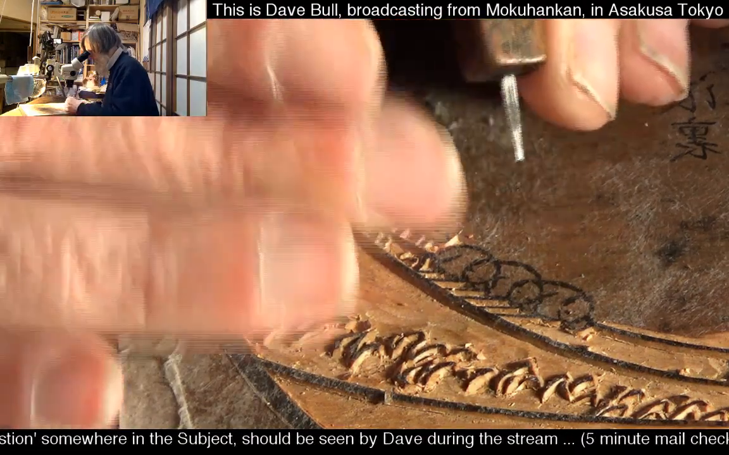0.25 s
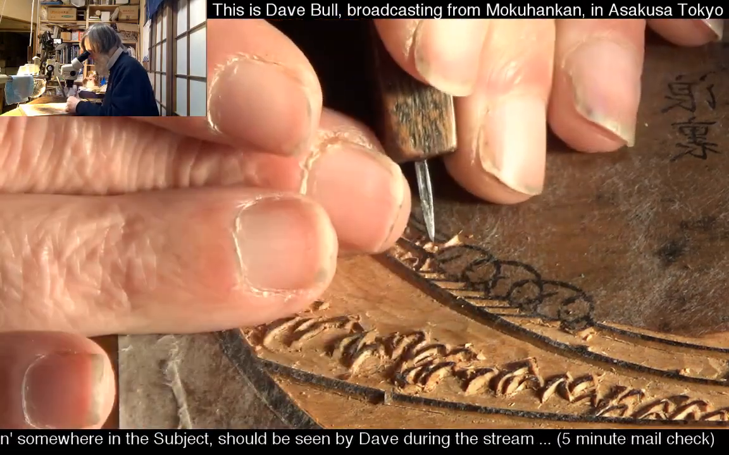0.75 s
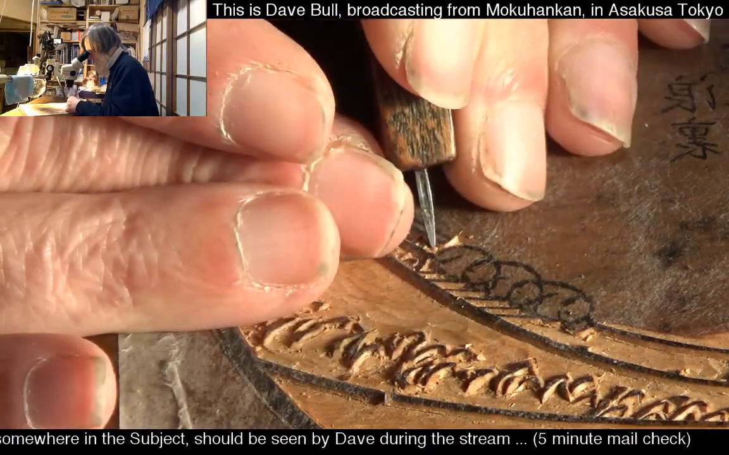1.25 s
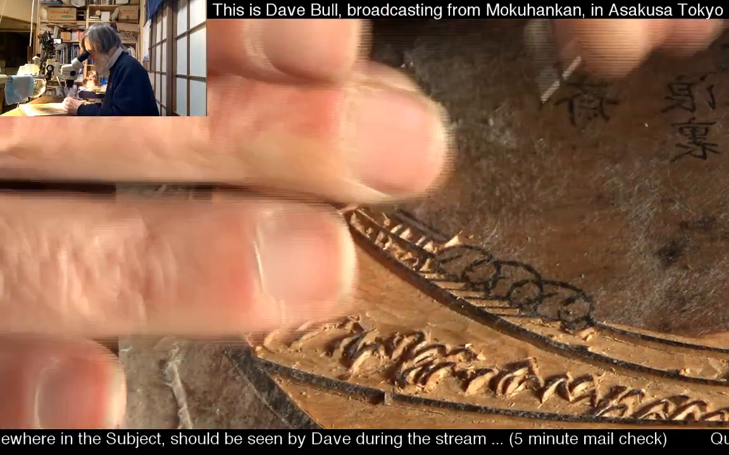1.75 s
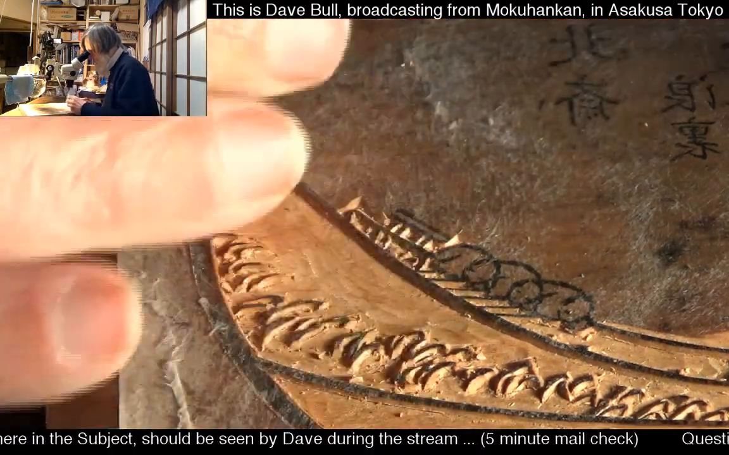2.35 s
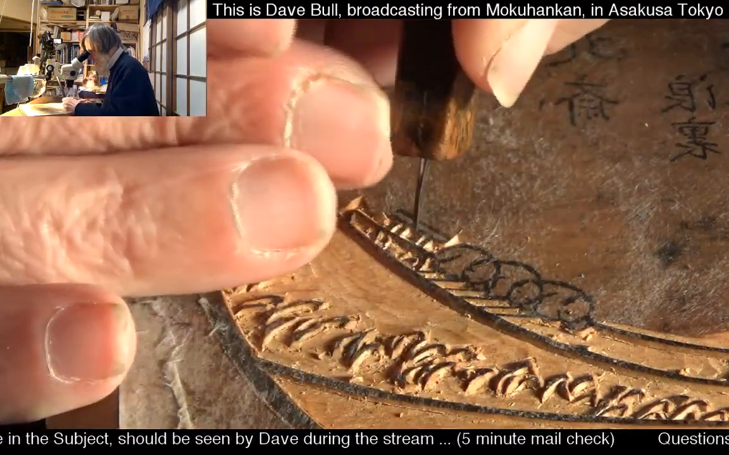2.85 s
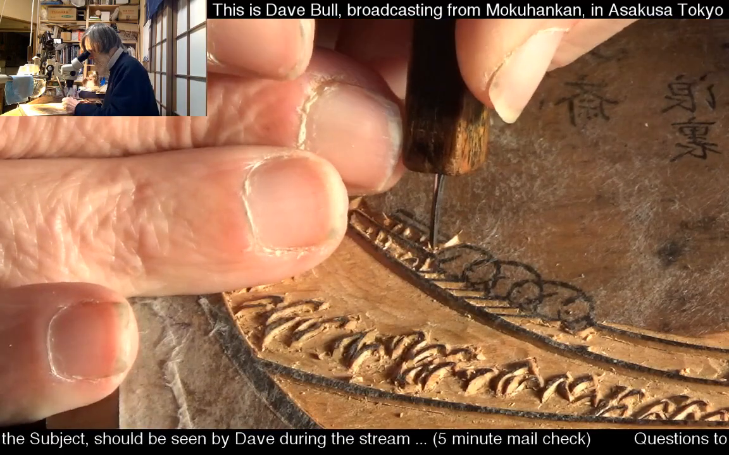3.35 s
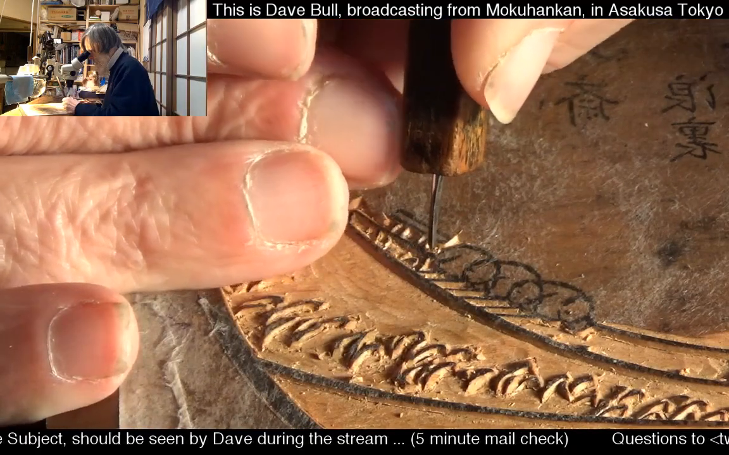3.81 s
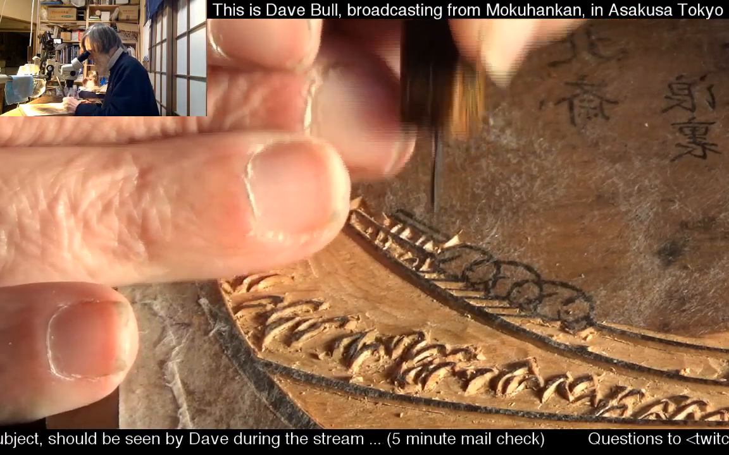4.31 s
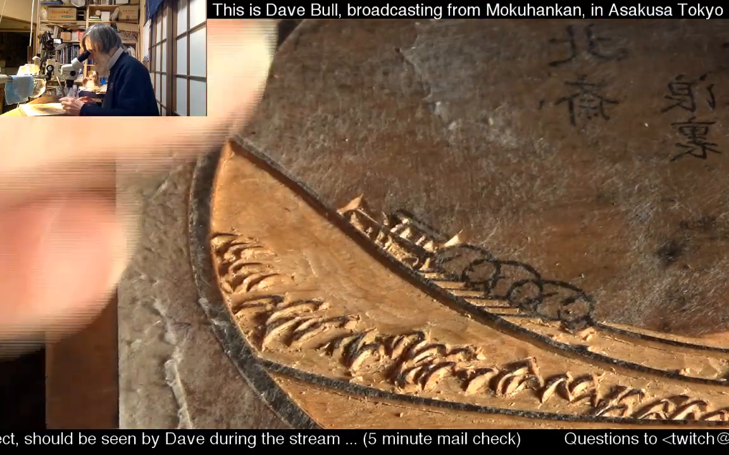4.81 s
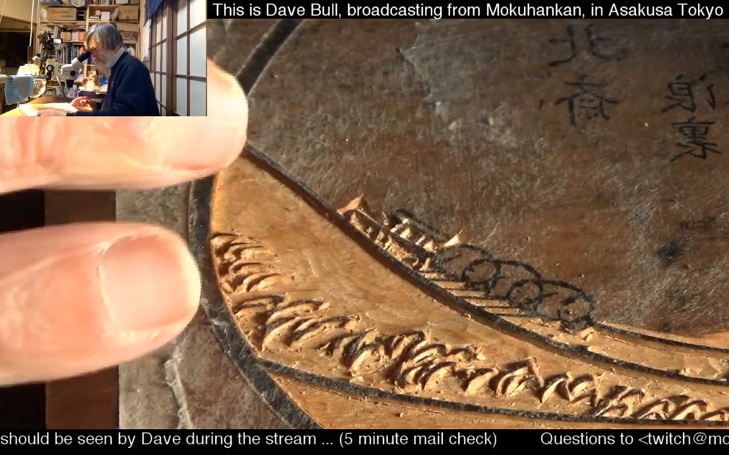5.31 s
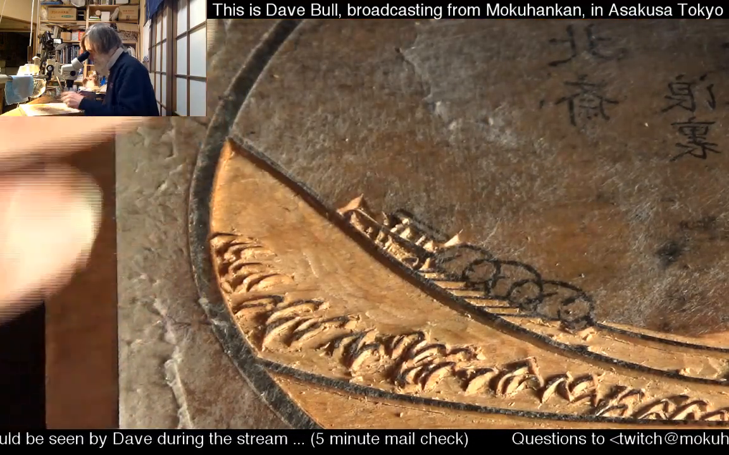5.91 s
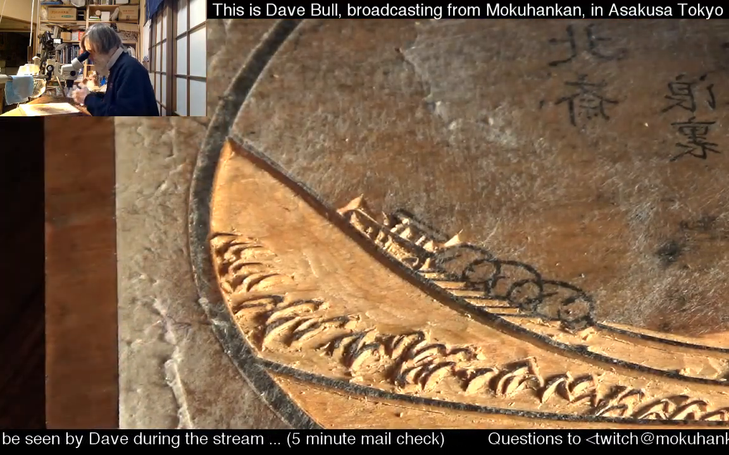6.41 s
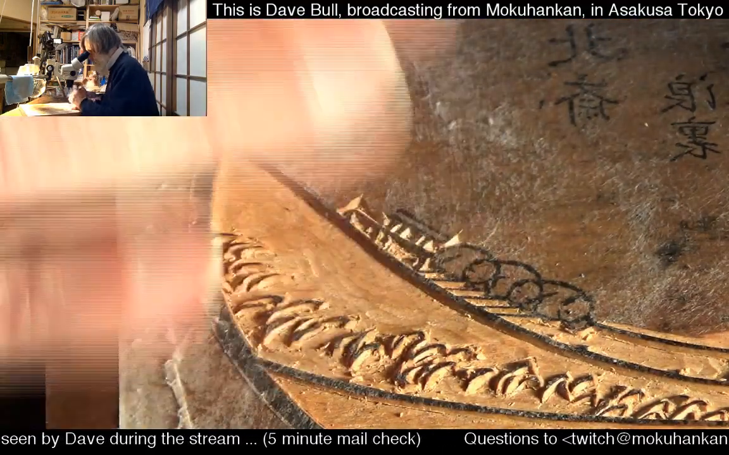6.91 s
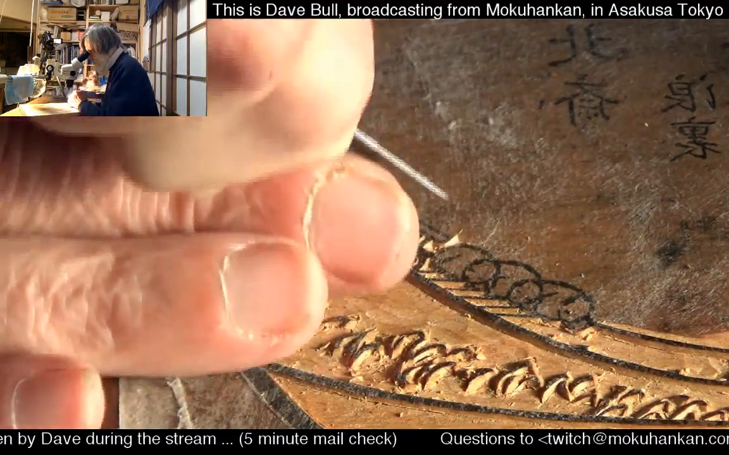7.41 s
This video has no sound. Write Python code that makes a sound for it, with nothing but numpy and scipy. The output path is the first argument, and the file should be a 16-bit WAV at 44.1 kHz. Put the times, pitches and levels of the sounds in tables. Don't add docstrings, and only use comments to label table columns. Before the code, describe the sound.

Close stereo microphone in a small workshop with a short echo. Fingers brush dryly over a wooden block; a blade pops out a chip with a sharp crack and fibre tear, then gives a softer, duller pop. More brushing and tiny squeaks follow. Tools drop with a hard ringing clatter onto a wooden rack. Finally a palm wipes the block and it drags slightly on the bench.

```python
import sys
import numpy as np
from scipy import signal
from scipy.fft import rfft, irfft, next_fast_len
from scipy.io import wavfile
from scipy.ndimage import uniform_filter1d, map_coordinates

SR = 44100
rng = np.random.default_rng(int(sys.argv[2]) if len(sys.argv) > 2 else 0)


def volts_from_decibels(level):
    exponent = np.asarray(level, float) / 20
    return 10 ** exponent


def put_to_file(sound):
    columns = np.atleast_2d(sound).T
    safe = np.clip(columns, -1, 1)
    whole_steps = np.round(safe * 32767)
    wavfile.write(sys.argv[1], SR, whole_steps.astype(np.int16))


N = 337806
TIME = np.arange(N) / SR

# (time [s], hold [s], block tone level [dB], dry hiss level [dB], fade [dB/s])
SWEEPS = [(0, 0.016, -60, -49, 154), (0.227, .01, -38, -55, 207), (0.24, 0.0092, -37, -39.5, 233),
          (0.4, 0.056, -56.5, -78, 196), (0.513, .005, -65, -58, 184), (1.505, 0.1, -54.5, -60, 102),
          (1.768, 0.025, -31.5, -36, 300), (1.814, 0.012, -34, -36.5, 154),
          (2.162, 0.042, -47.5, -50.5, 61), (2.363, 0.018, -75, -53, 152), (2.496, 0.048, -51.5, -55, 98),
          (2.578, 0.054, -49, -54, 103), (2.698, 0.01, -48.5, -54.5, 152), (2.891, 0.022, -80, -77, 104),
          (3.463, 0.0054, -78, -76, 301), (4.184, 0.021, -69, -61, 250), (4.398, 0.037, -41.5, -49.5, 96),
          (4.488, 0.034, -34, -37, 271), (4.703, 0.35, -79.5, -61.5, 104), (4.903, 0.024, -45, -52.5, 133),
          (5.03, 0.0096, -70, -54.5, 83.5), (5.244, .03, -62.5, -57, 101), (5.729, 0.03, -65, -51.5, 105),
          (5.919, 0.024, -85, -66, 97), (6.447, 0.11, -88, -60.5, 154), (6.538, 0.0058, -63, -52, 251),
          (6.639, 0.039, -57, -61, 130), (6.889, .03, -52, -56, 131.5)]
SWEEP_RISE_DB_PER_S = 609.5
# (frequency [Hz], width [Hz], level [dB])
BLOCK_TONES = [(563, 150, -7), (985, 130, 2), (1350, 150, -1), (2040, 150, 4), (3130, 260, 3),
               (4240, 260, 2.5), (5330, 380, -1), (6150, 600, -9)]
# (frequency [Hz], level [dB per Hz])
SKIN_HISS = [(290, -34.5), (500, -7.5), (906, 9), (1620, -2), (2040, 1), (3650, -7.5), (4280, -13.5),
             (13600, -15), (16000, -22.5)]
FIDGET_TONE_DB, FIDGET_HISS_DB, FIDGET_FOLLOWS = -71.5, -71.5, 1.4
# (time [s], level [dB])
STIR = [(0, 9), (.5, 5), (1.3, 1.5), (1.7, 6.5), (2.8, 4), (3.3, 0), (4.3, -1), (4.6, 2), (5.2, 3.5),
        (5.9, 3), (6.2, -2), (6.6, 5), (7.66, 3.5)]

# (time [s], crack level [dB], bright edge level [dB], block level [dB], crack length [s])
KNOCKS = [
    (1.484, -6, -1, -7, 0.011),
    (2.145, -23.5, -41, -12, 0.0075),
]
# (frequency [Hz], width [Hz], level [dB])
RAP_TONES = [(944, 250, 5.5), (2050, 110, -5.5), (2770, 420, -4), (3200, 200, 3), (4202, 380, -1),
             (5100, 990, -0.5), (7760, 350, -10.5)]
# (time [s], hold [s], level [dB], fade [dB/s])
TEARS = [
    (0, 0.0014, -24.5, 518),
    (1.479, .004, -43.5, 904.5),
    (1.49, 0.0078, -21, 699.5),
    (1.5, 0.0039, -21.5, 607),
    (1.51, 0.0087, -37.5, 347.5),
]
TEAR_RISE_DB_PER_S = 2998
# (frequency [Hz], width [Hz], level [dB])
FIBRE_TONES = [(960, 650, -1), (1890, 530, -2.5), (2793, 400, 2.5), (3583, 400, 1.5), (5060, 1400, -1.5),
               (7450, 1200, 3), (9500, 1500, -1), (13500, 1400, -8.5)]
# (time [s], peak level [dB])
SNAPS = [
    (.505, -38),
    (2.8985, -42),
    (5.17, -51.5),
    (5.394, -14.5),
    (5.654, -19),
]
# (time [s], deep level [dB], panel level [dB])
THUMPS = [
    (0.001, -18.5, -28),
    (.012, -63, -23.5),
    (1.485, -49, -15.5),
    (1.4937, -37.5, -31),
    (1.504, -17, -22.5),
    (2.147, -21, -28.5),
    (2.156, -22, -33),
]
# (frequency [Hz], level [dB], t60 [s])
THUD_MODES = [(84.55, -6.5, .25), (164, 0, 0.064)]

# (time [s], panel level [dB])
PUSHES = [(0.08, -65), (0.26, -33.5), (0.44, -53), (0.66, -71), (1.28, -50), (1.56, -44.5), (1.63, -36.5),
          (1.81, -30.5), (1.92, -41), (2.2, -46), (2.299, -43), (2.45, -66), (2.68, -39), (2.93, -45),
          (3.47, -54), (3.701, -49), (4.0, -44.5), (4.16, -56.5), (4.4, -43), (4.62, -40.5), (4.9, -48),
          (5.8, -41), (6.0, -51), (6.82, -32), (6.93, -52.5), (7.24, -35), (7.39, -38), (7.47, -40),
          (7.55, -37), (7.63, -28.5)]
PUSH_RISE_DB_PER_S, PUSH_HOLD_S, PUSH_FADE_DB_PER_S = 220, 0.0042, 151
# (frequency [Hz], width [Hz], level [dB])
BENCH = [(59.3, 18, -10.5), (93, 25, -11.5), (155, 67, -1.5), (208, 25, -9), (262.5, 34, -0.5),
         (332.4, 68, -4.5), (465, 95, -14)]
REST_DEEP_DB, REST_PANEL_DB, REST_FOLLOWS = -58, -66, 1.1
SHOVE_S, SHOVE_LENGTH_S, SHOVE_HZ, SHOVE_DB = 6.8, 0.089, 86.7, -22.5

# (frequency [Hz], level [dB per Hz])
AIR = [(15, -30), (25, -2.5), (339, -12), (553, -16.5), (726, -17.5), (2040, -28), (2330, -26.5),
       (4240, -36), (8830, -40.5), (15200, -40.5), (16500, -58.5)]
# (frequency [Hz], level [dB])
AIR_SIDE = [(30, -7.5), (60, -15), (110, 0.5), (200, 0.5), (380, -4), (700, -14), (1290, -10.5), (2380, -5),
            (4400, 1), (8120, 4.5), (15000, 11.5)]
AIR_DB, LAMP_HZ, LAMP_DB = -53.5, 15100, -80

# (frequency [Hz], t60 [s])
ROOM_DECAY = [(125, 0.45), (500, 0.23), (2000, 0.19), (6000, 0.074), (14000, 0.15)]
# (frequency [Hz], level [dB])
ROOM_COLOUR = [(3000, -1.5), (8000, -1.5), (15000, -3.5)]
# (frequency [Hz], level [dB])
ROOM_SIDE = [(60, -12.5), (200, -15.5), (500, -25.5), (1300, -24.5), (3000, -13.5), (5000, -9), (8000, -7),
             (15000, -4.5)]
ROOM_DB, FIRST_ECHO_S = -11, 0.0053

# (time [s], peak level [dB])
BUMPS = [(0.199, -36), (0.262, -33), (0.308, -39), (0.583, -34.5), (0.658, -34), (0.813, -37), (0.846, -39),
         (0.92, -39), (0.976, -36.5), (1.1, -45), (1.278, -39), (1.777, -47), (1.905, -34), (2.017, -39.5),
         (2.258, -31.5), (2.408, -41.5), (2.48, -39.5), (2.658, -32), (2.917, -40), (3.716, -44),
         (4.643, -43), (4.911, -41), (5.158, -38.5), (5.439, -30.5), (5.63, -27.5), (5.811, -37),
         (6.358, -36.5), (7.238, -38), (7.355, -35), (7.571, -35.5)]
BUMP_HZ, BUMP_SPREAD, BUMP_S = 90.7, 0.32, 0.0072

# (time [s], peak level [dB], pitch [Hz], length [s])
TICKS = [(0.5035, -46, 10500, 0.0066), (0.5036, -40, 14000, .005), (.5037, -56, 5500, .005),
         (1.4835, -16.5, 982, 0.0039), (2.2675, -39, 12200, .0035), (2.8965, -47, 13000, 0.005),
         (2.8966, -66, 5040, 0.0041), (3.4565, -48.5, 9130, 0.0088), (3.8145, -63, 13200, .0035),
         (4.1465, -32.5, 8400, 0.013), (4.1475, -47, 3180, 0.0086), (4.1655, -38.5, 8700, 0.01),
         (4.1405, -37, 245, 0.011), (4.1705, -39, 256, 0.044), (4.2565, -53, 12500, .0065),
         (4.3745, -42, 2100, 0.011), (4.8965, -23.5, 12900, 0.021), (4.8966, -26, 3430, 0.012),
         (4.898, -36.5, 2250, .012), (6.545, -46, 2300, 0.043), (6.655, -49, 3330, 0.044),
         (4.8967, -40, 9700, 0.018), (4.9545, -46, 7800, 0.007), (5.7555, -40.5, 12000, 0.058),
         (5.9295, -52.5, 11500, 0.045), (6.4455, -42, 12300, 0.1), (6.5375, -30.5, 2250, 0.0065),
         (6.6145, -43, 970, 0.0088), (6.6485, -38, 3570, 0.0084), (6.6675, -44, 2580, 0.012),
         (6.7415, -37.5, 667, 0.1), (6.7445, -42, 1100, 0.099), (6.7505, -31, 915, 0.011),
         (6.7625, -31.5, 964, 0.016), (6.7875, -43, 926, 0.0125), (6.947, -43, 516, 0.017),
         (7.2155, -45, 4310, 0.01), (7.2136, -42.5, 954, 0.016), (7.3725, -36, 957, .0125)]
# (time [s], peak level [dB], pitch [Hz], length [s])
SQUEAKS = [
    (.4, -56, 1950, .04),
    (.45, -54, 2020, .045),
    (1.17, -59, 2000, .035),
    (1.31, -58, 2050, .04),
    (4.36, -45, 2030, .08),
    (4.488, -42, 1330, .04),
    (4.46, -44, 2030, .08),
    (4.897, -28, 3480, .026),
    (4.815, -52, 3050, .02),
    (5.205, -52, 7300, .065),
]
TICK_WIDTH, SQUEAK_WIDTH = 0.23, 0.07
TICK_ROOM_DB = -2

# (time [s], crack level [dB], wood level [dB], blade level [dB], blade free for [s])
LONG_DROPS = [(5.263, 9.5, -8.5, -3.5, 0.015), (5.285, -24.5, -11, -16, 0.011),
              (5.295, -26.5, -10, -11, .013), (5.3315, 8, -8.5, -29, 0.004),
              (5.335, -20.5, -14, -13.5, 0.02), (5.367, -5, -6.5, -16.5, 0.0073),
              (5.372, -18, -14, -30, 0.013), (5.378, -5.5, -7, -33, 0.016),
              (5.413, -35.5, -31.5, -22, 0.011), (5.436, -35, -33, -23, 0.0043),
              (5.52, -8.5, -20, -28, 0.029), (5.5442, 11.5, -8.5, -9.5, 0.024),
              (5.569, -19.5, -10.5, -35, 0.0075), (5.576, -27, -14, -33.5, 0.0083)]
# (time [s], crack level [dB], wood level [dB], blade level [dB], blade free for [s])
SHORT_DROPS = [(5.395, -14.5, -12.5, -43, .01), (5.402, 3.5, -12, -3, 0.0022), (5.413, 3, -12.5, -7, 0.023),
               (5.429, -24, -21.5, -40.5, 0.012), (5.437, -22.5, -24.5, -38, 0.011),
               (5.591, -28, -13, -28, .009), (5.6023, -2, -11.5, -33, 0.0045),
               (5.613, -32, -21, -23, 0.046), (5.625, -29, -18, -40, 0.0079),
               (5.6422, -6, -11.5, -18.5, 0.039), (5.656, -30.5, -16.5, -45, .05)]
# (frequency [Hz], level [dB], t60 [s])
LONG_BLADE = [(3235, -5, 0.3), (3205, -15, .1), (3290, -24, 0.04), (7050, -13, 0.02), (8900, -22, 0.07),
              (9150, -24, 0.09)]
# (frequency [Hz], level [dB], t60 [s])
SHORT_BLADE = [(4185, -12, .22), (4222, -18, .12), (4270, -22, 0.04), (5450, -21, 0.03), (7260, -19, 0.03),
               (10900, -24, 0.01)]
# (frequency [Hz], level [dB], t60 [s])
RACK = [(255.4, 0, 0.22), (361.5, -4, 0.16), (430, -6.5, 0.065), (511, 2, 0.12), (538, 1, 0.13),
        (585, -4, 0.12), (681, -2.5, 0.084), (882, -3, 0.028), (1073.5, 4.5, 0.11), (1098, 3.5, 0.13),
        (1290, -5, 0.035), (1486, 0.5, 0.06), (1890, -2, 0.03), (2366, -5.5, 0.05)]
# (frequency [Hz], width [Hz], level [dB])
CLACK_TONES = [(543, 460, 2), (1146, 240, 4.5), (1488, 400, 5.5), (2300, 2100, -2.5)]
# (time [s], hold [s], level [dB], fade [dB/s])
RATTLE = [
    (5.27, 0.044, -24.5, 351),
    (5.348, 0.051, -30.5, 292.5),
    (5.377, 0.042, -19, 1100.5),
    (5.554, 0.055, -22, 302),
    (5.641, 0.031, -26.5, 450),
]
RATTLE_RISE_DB_PER_S = 4999.5
HARD_BLOW_SHEEN = 0.7
STEEL_FLUTTER_DB, STEEL_FLUTTER_PER_S = 3.5, 90
CHOKE_LEAK_DB = -24
REBOUND_S = 0.0015

# (time [s], hold [s], level [dB], fade [dB/s])
WIPE = [
    (6.808, 0.017, -42.5, 200),
    (6.828, 0.025, -34, 326),
    (6.87, 0.011, -51, 202),
]
WIPE_RISE_DB_PER_S = 2503
# (frequency [Hz], width [Hz], level [dB])
WIPE_TONES = [(910, 400, -3.5), (1320, 590, -6.5), (2070, 390, -4.5), (3070, 690, -4), (4170, 550, -0.5),
              (5280, 820, -3), (6400, 1100, -7.5), (9300, 5600, -12), (13800, 3400, -13)]

# (time [s], level [dB], shift of its contact tones [semitones])
SLIDE = [
    (7.2, -93.5, 1.2),
    (7.22, -52.5, 1.25),
    (7.25, -48, 0.62),
    (7.31, -48, -0.3),
    (7.345, -45.5, -0.38),
    (7.366, -48, -0.27),
    (7.376, -46, .45),
    (7.54, -37, -.3),
    (7.66, -41.5, -0.55),
]
# (frequency [Hz], width [Hz], level [dB])
SLIDE_TONES = [(265, 73, 8), (610, 500, -6), (1000, 270, 2), (1240, 140, -9), (1810, 130, -12),
               (2150, 200, -7), (3600, 360, -4.5), (4460, 190, -13), (5180, 900, -26)]
# (time [s], extra level [dB])
CATCHES = [(7.222, 7), (7.245, 7), (7.293, 8), (7.312, 10), (7.335, -1), (7.374, 10.5), (7.406, 10.5),
           (7.444, 2), (7.467, 8.5), (7.498, 1), (7.53, 2.5), (7.565, 7.5), (7.59, -5), (7.63, -1)]
CATCH_RISE_DB_PER_S, CATCH_FADE_DB_PER_S = 3002, 500
# (time [s], hold [s], level [dB], fade [dB/s])
SINGING = [
    (7.293, 0.0048, -54, 300),
    (7.4, 0.091, -55.5, 70),
]
SINGING_RISE_DB_PER_S = 392
# (frequency [Hz], width [Hz], level [dB])
SLIDE_WHISTLES = [(7030, 680, 5.5), (8760, 270, 1), (10200, 270, 6), (11700, 270, 8.5), (12200, 270, 6)]

CUTOFF_HZ = 16700
TOP_HZ, TOP_OPENS_DB = 15650, -38


def rms_one(x):
    return x / np.sqrt(np.mean(x ** 2) + 1e-20)


def in_time(rows):
    s, *columns = np.transpose(rows)
    return [np.interp(TIME, s, column) for column in columns]


def filtered(x, order, hz, kind):
    return signal.sosfilt(signal.butter(order, hz, kind, fs=SR, output="sos"), x)


def coloured(x, points):
    hz, level_db = np.transpose(points)
    size = next_fast_len(x.shape[-1])
    log_hz = np.log(np.arange(size // 2 + 1) * SR / size + 1)
    gain = volts_from_decibels(np.interp(log_hz, np.log(hz), level_db))
    return irfft(rfft(x, size) * gain, size)[..., :x.shape[-1]]


def resonance(x, hz, width_hz):
    r = np.exp(-np.pi * width_hz / SR)
    feedback = [1, -2 * r * np.cos(2 * np.pi * hz / SR), r * r]
    return signal.lfilter([(1 - r * r) / 2, 0, (r * r - 1) / 2], feedback, x)


def body(x, peaks):
    total = 0
    for k, (hz, width_hz, db) in enumerate(peaks):
        twice = resonance(resonance(x, hz, width_hz), hz, width_hz)
        total = total + (-1) ** k * volts_from_decibels(db) * twice
    return total


def drift(per_s):
    coarse = map_coordinates(rng.standard_normal(1000), [TIME[::64] * per_s], order=3)
    return np.interp(TIME, TIME[::64], coarse)


def drifting_body(x, peaks, spread_db, per_s):
    return sum(volts_from_decibels(spread_db * drift(per_s)) * body(x, [peak]) for peak in peaks)


def swells(s, hold_s, db, rise_db_per_s, fade_db_per_s):
    t = TIME[::32]
    rows = np.broadcast_arrays(s, hold_s, db, fade_db_per_s)
    s, hold_s, db, fade = (column[:, None] for column in rows)
    rise_loss = rise_db_per_s * (s - t).clip(0)
    fade_loss = fade * (t - s - hold_s).clip(0)
    power = np.sum(volts_from_decibels(db - rise_loss - fade_loss) ** 2, axis=0)
    return np.interp(TIME, t, np.sqrt(power))


def grains(per_s, spread_db):
    sizes = volts_from_decibels(spread_db * np.minimum(rng.exponential(1, N), 5)) * rng.choice([-1, 1], N)
    return rms_one(sizes * (rng.random(N) < per_s / SR)) + 1e-18


def struck(modes, length_s, scatter_db):
    t = TIME[:int(length_s * SR)]
    scatter = rng.normal(0, scatter_db, len(modes))
    ring = np.zeros(len(t))
    for (hz, db, t60), extra_db in zip(modes, scatter):
        ring += volts_from_decibels(db + extra_db - 60 * t / t60) * np.sin(2 * np.pi * hz * t)
    return ring


def burst(length_s):
    t = TIME[:4096]
    return rng.standard_normal(4096) * volts_from_decibels(-60 * t / length_s) * np.minimum(t / 0.00041, 1)


def click(length_s):
    again = 4 + round(REBOUND_S * rng.uniform(0.7, 1.3) * SR)
    push, rebound = signal.unit_impulse(4096, 4), signal.unit_impulse(4096, again)
    return 0.74 * burst(length_s) + 1.7 * push - 1.4 * rebound


def add(out, s, piece):
    at = max(round(s * SR), 0)
    out[at:at + len(piece)] += piece[:N - at]


def rubbing():
    s, hold_s, tone_db, hiss_db, fade = np.transpose(SWEEPS)
    fidget_db = FIDGET_FOLLOWS * in_time(STIR)[0]
    ringing = swells(s, hold_s, tone_db, SWEEP_RISE_DB_PER_S, fade) + volts_from_decibels(FIDGET_TONE_DB + fidget_db)
    rasping = swells(s, hold_s, hiss_db, SWEEP_RISE_DB_PER_S, fade) + volts_from_decibels(FIDGET_HISS_DB + fidget_db)
    plate = drifting_body(grains(3000, 3.2), BLOCK_TONES, 2.5, 24.0)
    wander = volts_from_decibels(2.5 * drift(40.0))
    broad = rms_one(resonance(grains(9000, 2.5), 3000, 4500))
    tone = rms_one(plate) + 0.1 * wander * broad
    hiss = filtered(coloured(grains(17000, 2.2), SKIN_HISS), 2, 5500, "high")
    return volts_from_decibels(-7.5) * ringing * tone + volts_from_decibels(-4.0) * rasping * rms_one(hiss)


def knocks():
    out = np.zeros(N)
    for s, crack_db, edge_db, block_db, length_s in KNOCKS:
        crack = burst(length_s)
        add(out, s, volts_from_decibels(crack_db) * resonance(crack, 2400, 7300))
        add(out, s, volts_from_decibels(edge_db) * body(crack, [(11500, 28000, 2.2)]))
        add(out, s, volts_from_decibels(block_db + 6) * body(click(length_s), RAP_TONES))
    s, hold_s, db, fade = np.transpose(TEARS)
    fibres = rms_one(body(grains(12000, 1.7), FIBRE_TONES))
    out += swells(s, hold_s, db, TEAR_RISE_DB_PER_S, fade) * fibres
    for s, db in SNAPS:
        add(out, s, volts_from_decibels(db) * resonance(click(0.005), 9000, 9000))
    panel_modes = [(hz, db, 2.0 / width_hz) for hz, width_hz, db in BENCH[3:]]
    for s, deep_db, panel_db in THUMPS:
        add(out, s, -volts_from_decibels(deep_db) * struck(THUD_MODES, 0.4, 1.0))
        add(out, s, -volts_from_decibels(panel_db) * struck(panel_modes, 0.4, 1.5))
    return out


def leaning():
    s, db = np.transpose(PUSHES)
    rest_db = REST_FOLLOWS * in_time(STIR)[0]
    pushes = swells(s, PUSH_HOLD_S, db, PUSH_RISE_DB_PER_S, PUSH_FADE_DB_PER_S)
    panel_gain = pushes + volts_from_decibels(REST_PANEL_DB + rest_db)
    deep = rms_one(body(grains(61, 3.5), BENCH[:2] + [(34.6, 10, -5.5)]))
    panel = rms_one(body(grains(330, 5.4), BENCH[2:]))
    since = TIME - SHOVE_S
    arch = np.sin(np.pi * np.clip(since / SHOVE_LENGTH_S, 0, 1))
    shove = volts_from_decibels(SHOVE_DB) * arch * np.sin(2 * np.pi * SHOVE_HZ * since)
    return volts_from_decibels(REST_DEEP_DB + rest_db) * deep + volts_from_decibels(-8) * panel_gain * panel + shove


def air():
    mid, side = coloured(rng.standard_normal((2, N)), AIR)
    level = np.std(mid)
    edges = np.geomspace(140, 6000, 19)
    stir_db, = in_time(STIR)
    for low, high in zip(edges, edges[1:]):
        band = filtered(mid, 1, [low, high], "band")
        mid = mid + band * (volts_from_decibels(stir_db + 3.7 * drift(18.0) - 3.5) - 1)
    hiss = (mid + coloured(side, AIR_SIDE) * [[1], [-1]]) / level
    lamp = rms_one(resonance(rng.standard_normal(N), LAMP_HZ, 90))
    return volts_from_decibels(AIR_DB - 6.0) * hiss + volts_from_decibels(LAMP_DB) * lamp


def room(x):
    t, tail = TIME[:int(0.5 * SR)], 0
    crossings = [np.sqrt(a[0] * b[0]) for a, b in zip(ROOM_DECAY, ROOM_DECAY[1:])]
    edges = [40] + crossings + [0.45 * SR]
    for (hz, t60), low, high in zip(ROOM_DECAY, edges, edges[1:]):
        band = filtered(rng.standard_normal((2, len(t))), 2, [low, high], "band")
        tail = tail + band * volts_from_decibels(-60 * t / t60)
    tail = coloured(tail, ROOM_COLOUR) * np.clip((t - FIRST_ECHO_S) / 0.0014, 0, 1)
    tail = tail / np.sqrt(np.sum(tail[0] ** 2))
    mid, side = signal.fftconvolve(x[None], tail, axes=1)[:, :N]
    return volts_from_decibels(ROOM_DB) * (mid + coloured(side, ROOM_SIDE) * [[1], [-1]])


def bumps():
    out, t = np.zeros(N), TIME[:4096] - TIME[2048]
    for s, db in BUMPS:
        hz = BUMP_HZ * (1 + BUMP_SPREAD * rng.standard_normal())
        phase = 2 * np.pi * rng.random()
        swing = np.exp(-0.5 * (t / BUMP_S) ** 2) * np.sin(2 * np.pi * hz * t + phase)
        add(out, s + t[0], volts_from_decibels(db) * swing)
    return out


def ticks():
    out, t = np.zeros(N), TIME[:4096]
    for rows, width in (TICKS, TICK_WIDTH), (SQUEAKS, SQUEAK_WIDTH):
        for s, db, hz, length_s in rows:
            swell = np.sqrt(np.sin(np.pi * np.clip(t / length_s, 0, 1) ** 1.1).clip(0))
            puff = body(swell * rng.standard_normal(4096), [(hz, width * hz, 0)])
            add(out, s, volts_from_decibels(db) * puff / np.abs(puff).max())
    return out


def tools():
    out, t = np.zeros(N), TIME[:int(0.3 * SR)]
    drops = [(LONG_BLADE, *row) for row in LONG_DROPS] + [(SHORT_BLADE, *row) for row in SHORT_DROPS]
    flutter = volts_from_decibels(STEEL_FLUTTER_DB * drift(STEEL_FLUTTER_PER_S))
    for blade, s, crack_db, wood_db, blade_db, free_s in drops:
        choke = volts_from_decibels(np.maximum(-3000 * np.maximum(t - free_s, 0), CHOKE_LEAK_DB))
        steel = volts_from_decibels(blade_db) * struck(blade, 0.3, 0.52) * flutter[round(s * SR):][:len(t)]
        contact = click(0.0055)
        sheen = volts_from_decibels(HARD_BLOW_SHEEN * crack_db - 16) * resonance(contact, 13000, 7000)
        add(out, s, volts_from_decibels(crack_db - 6.5) * (resonance(contact, 4500, 8900) + sheen))
        add(out, s, volts_from_decibels(wood_db + 9) * body(burst(0.023), CLACK_TONES))
        add(out, s, volts_from_decibels(wood_db - 17) * struck(RACK, 0.3, 2.5) + choke * steel)
    chatter = grains(900, 3.2)
    rack_tones = [(hz, 3.0 / t60 + 15, db) for hz, db, t60 in RACK]
    wood = rms_one(body(chatter, rack_tones)) + 0.58 * body(chatter, [(4470, 4000, 0.0083)])
    s, hold_s, db, fade = np.transpose(RATTLE)
    out += swells(s, hold_s, db, RATTLE_RISE_DB_PER_S, fade) * wood
    return filtered(out, 6, 230, "high")


def wipe():
    s, hold_s, db, fade = np.transpose(WIPE)
    skin = rms_one(body(grains(7000, 1.6), WIPE_TONES))
    return swells(s, hold_s, db, WIPE_RISE_DB_PER_S, fade) * skin


def slide():
    level_db, semitones = in_time(SLIDE)
    drag = rms_one(drifting_body(grains(3200, 2.8), SLIDE_TONES, 2.0, 25.0))
    place = np.cumsum(2 ** (semitones / 12)) - SR
    drag = map_coordinates(drag, [np.clip(place, 0, N - 1)], order=1)
    at, extra_db = np.transpose(CATCHES)
    drag = drag * (0.63 + swells(at, 0.0021, extra_db - 9.5, CATCH_RISE_DB_PER_S, CATCH_FADE_DB_PER_S))
    whistle = rms_one(drifting_body(grains(9800, 2.7), SLIDE_WHISTLES, 3.5, 14.0))
    whistle += 0.9 * resonance(rng.standard_normal(N), 10000, 8000)
    s, hold_s, db, fade = np.transpose(SINGING)
    singing = swells(s, hold_s, db, SINGING_RISE_DB_PER_S, fade) * whistle
    return volts_from_decibels(level_db) * drag * (TIME > SLIDE[0][0]) + singing


def scene():
    near = rubbing() + wipe() + knocks() + tools() + slide()
    scuffs = ticks()
    echo = room(near + volts_from_decibels(TICK_ROOM_DB) * scuffs)
    return near + scuffs + echo + leaning() + air() + bumps()


def top_cut(x):
    return signal.sosfilt(signal.butter(12, 16740, fs=SR, output="sos"), x)


def record(dry):
    cut = signal.sosfilt(signal.cheby2(14, 45, CUTOFF_HZ, fs=SR, output="sos"), dry)
    rounded = 1.317 * np.tanh(cut / 1.272)
    top = signal.sosfiltfilt(signal.butter(16, TOP_HZ, "high", fs=SR, output="sos"), rounded)
    sharp = uniform_filter1d(np.abs(top[0]), size=128) > volts_from_decibels(TOP_OPENS_DB)
    opening = uniform_filter1d(sharp * 1.0, size=128)
    return top_cut(rounded - top * (1 - opening))


dry = scene()
out = record(dry)
put_to_file(out)
```